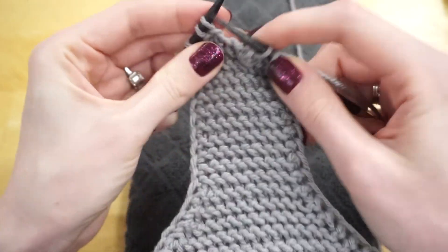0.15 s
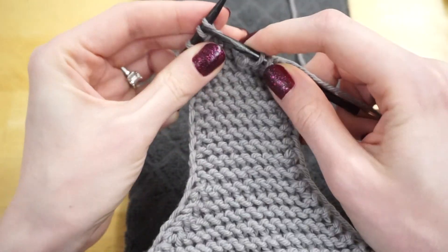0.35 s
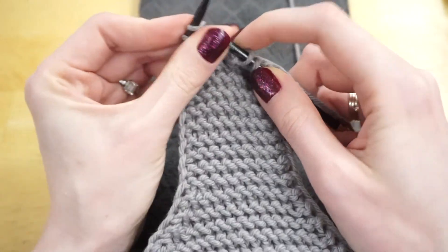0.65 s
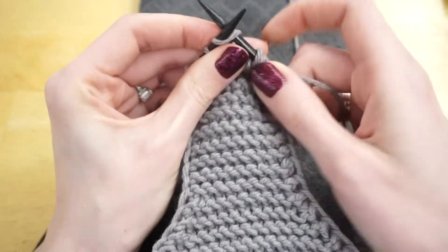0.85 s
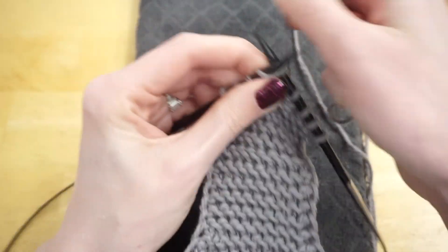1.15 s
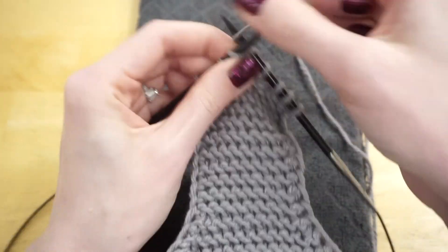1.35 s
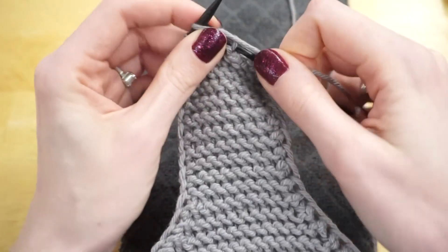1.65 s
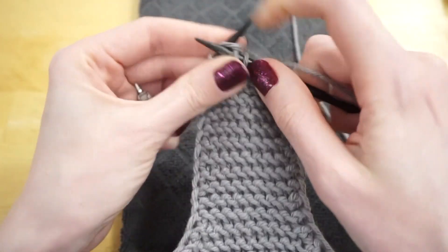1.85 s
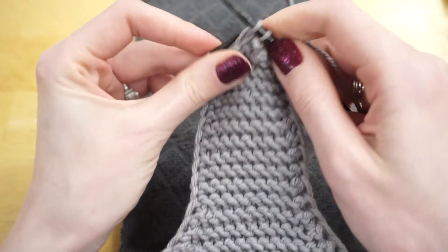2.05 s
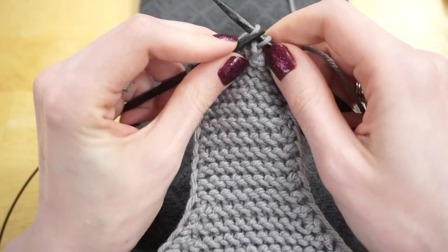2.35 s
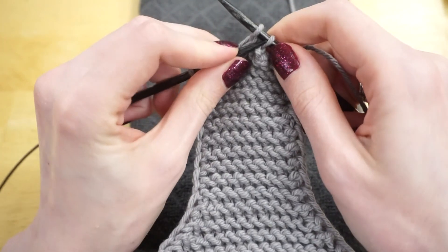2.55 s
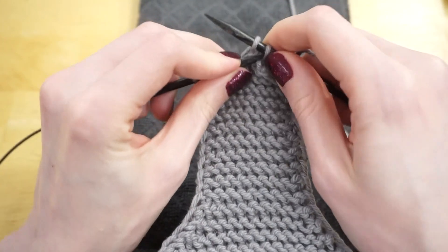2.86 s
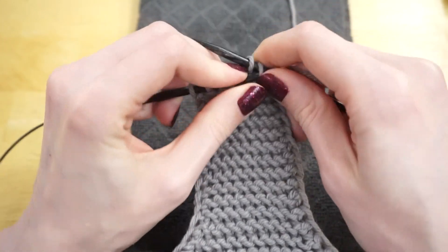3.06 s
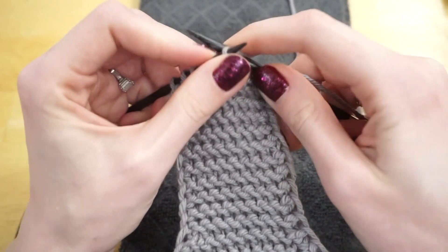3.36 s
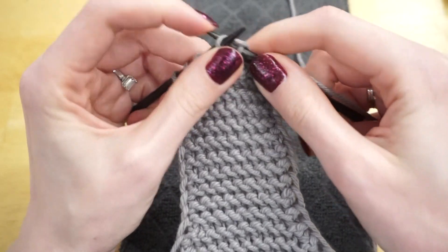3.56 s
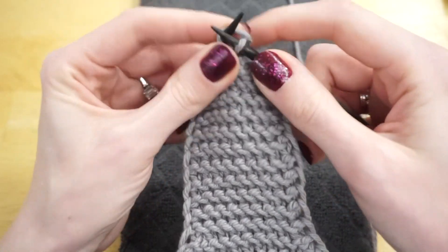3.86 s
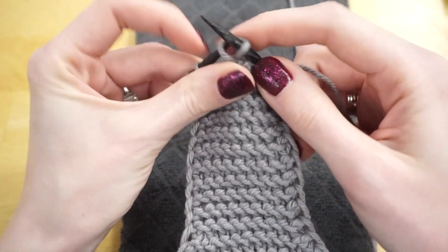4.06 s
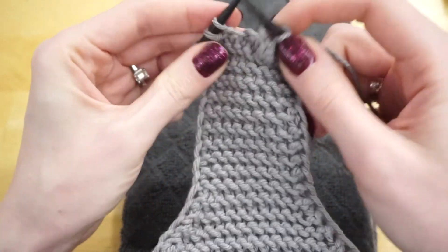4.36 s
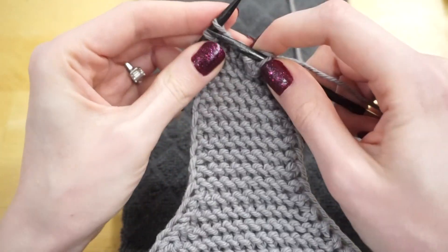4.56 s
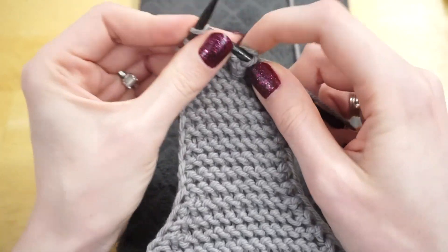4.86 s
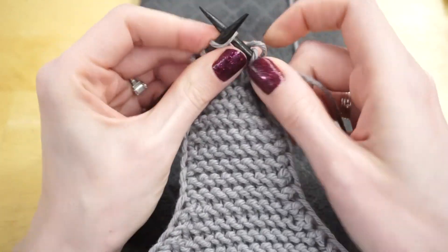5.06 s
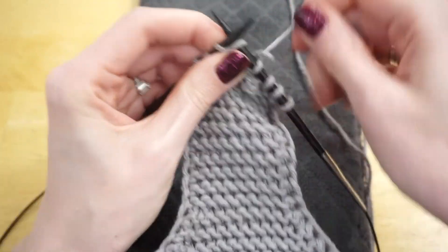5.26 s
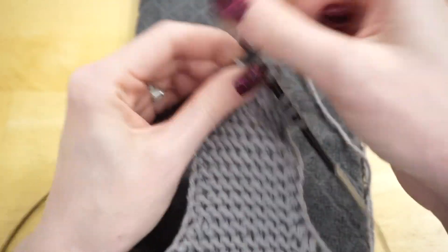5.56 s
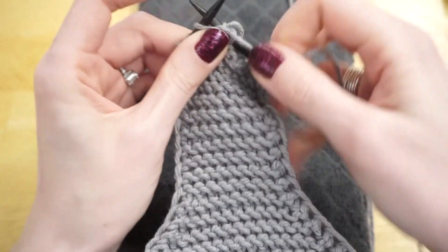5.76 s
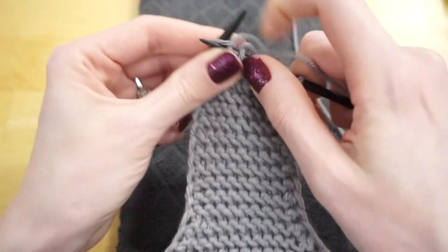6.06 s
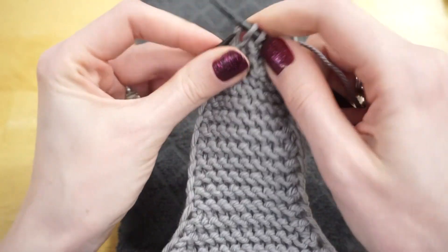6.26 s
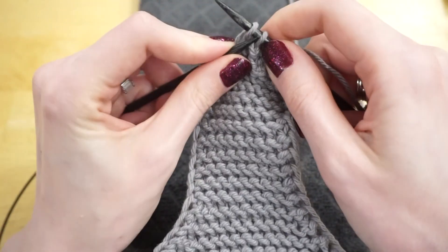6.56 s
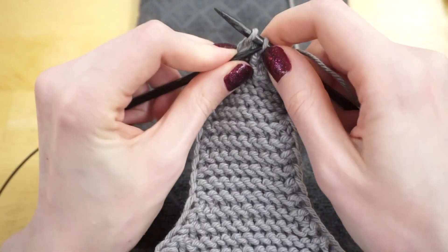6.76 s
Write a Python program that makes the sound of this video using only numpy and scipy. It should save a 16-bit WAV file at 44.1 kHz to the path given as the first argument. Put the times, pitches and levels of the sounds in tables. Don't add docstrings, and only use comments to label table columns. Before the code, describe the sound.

Quiet indoor room, close stereo microphones, little reverberation. A low fan hum wavers softly throughout, with a faint hollow rattle fluttering about fifteen times a second, swelling and fading. A soft slide opens the scene, and a crisp double needle knock comes at 0.15-0.2 s. Small scrapes and clicks follow at 0.6-0.8 s. From 0.9 to 1.4 s yarn swishes airily over fingers while cloth shuffles dully; clacks and slides continue to 2.2 s. Around 2.5 s it becomes sparse, with one light tick. Tiny ticks cluster near 3.1 s amid soft swishing, then scrapes and taps at 3.4-3.8 s. Sharper knocks strike at 4.13 and 4.4 s, while the rattle grows clearer around 4.5 s. Between 4.8 and 5.9 s clicks, yarn strokes and slides crowd together. Brushing continues past 6 s, a clack lands at 6.4 s, and a final small tick comes at 6.85 s.

```python
import sys
import numpy as np
from scipy import signal
from scipy.fft import rfft, irfft
from scipy.io import wavfile
from scipy.ndimage import uniform_filter1d

SR = 44100
rng = np.random.default_rng(int(sys.argv[2]) if len(sys.argv) > 2 else 0)


def volts_from_db(level):
    exponent = np.asarray(level, float) / 20
    return 10 ** exponent


def int16_out(signal):
    q = np.round(np.clip(np.atleast_2d(signal).T, -1, 1) * 32767)
    wavfile.write(sys.argv[1], SR, q.astype(np.int16))


N = 304069
T = np.arange(N) / SR
FREQ = np.maximum(np.arange(N // 2 + 1) * SR / N, 1)

# frequency in Hz, level in dB, 60 dB decay time in seconds.
SHAFT = [
    (2490, 2, 0.017),
    (2900, 0, 0.012),
    (3590, -1, .009),
    (1810, -5, 0.006),
]
# time in seconds, lowest shaft mode in Hz, extra body click of a knock in dB.
GRIP = [(0.15, 2700, 0), (0.2, 2800, -2), (0.61, 2350, -5), (1.1, 2450, -2), (1.58, 2300, 0),
        (1.69, 2500, -1), (2.05, 2500, 0), (4.13, 2400, -1), (4.39, 2650, 3), (4.8, 2650, 0),
        (5.23, 2700, 2), (5.26, 2500, 1), (5.36, 2450, -2), (5.61, 2500, 4), (5.83, 2300, -1),
        (6.41, 2400, 0)]


def on_log_hz(table):
    hz, value = np.transpose(table)
    return np.interp(np.log(FREQ), np.log(hz), value)


def band(x, lo_hz, hi_hz):
    return signal.sosfilt(signal.butter(2, [lo_hz, hi_hz], "band", fs=SR, output="sos"), x)


def ring(x, hz, t60):
    pole = np.exp(2j * np.pi * hz / SR - np.log(1000) / (t60 * SR))
    return signal.lfilter([1], [1, -pole], x).imag


def walk(rate):
    hold = int(SR / rate)
    steps = np.repeat(rng.standard_normal(N // hold + 1), hold)
    return 1.06 * uniform_filter1d(uniform_filter1d(steps, hold), hold)[:N]


def pair(mid, side, pan_db):
    return np.array([(mid + side) * volts_from_db(pan_db / 2), (mid - side) * volts_from_db(-pan_db / 2)])


def room_air():
    # frequency in Hz, width in Hz, height over the air noise in dB.
    room_modes = [(29.8, 10, 9), (56.3, 13, 7), (119.7, 9.7, 5), (145.9, 15, 8), (170.7, 23, 2.5),
                  (222.8, 19, 7), (247.7, 11, 4.5), (311, 7.9, 4), (377.7, 14, 3.5), (538.4, 10, 4.5)]
    # frequency in Hz, density in dB per Hz.
    air = [(15, -91.5), (40, -82.5), (80, -85.5), (118, -75.5), (250, -74), (400, -85), (700, -94.5),
           (1100, -98.5), (1400, -103), (2500, -106.5), (4500, -108), (9000, -108.5), (12000, -108),
           (16000, -108)]
    # frequency in Hz, side minus mid in dB.
    air_side = [(60, -20), (110, -23), (200, -20), (380, -7.5), (700, -0.5), (1290, 3.5), (2380, 4),
                (4400, 4), (8120, 1.5), (15000, -0.5)]
    # time in seconds, hum level in dB.
    hum = [(0.0, -48.5), (0.9, -48), (1.1, -46.5), (1.44, -46.5), (1.5, -49), (1.7, -46.5), (1.78, -49),
           (2.01, -47), (2.7, -50), (3.05, -47.5), (3.5, -46), (3.95, -46), (4.2, -51), (4.43, -48),
           (6.31, -50), (6.54, -51.5), (6.62, -48.5), (6.89, -48.5)]
    lift = sum(volts_from_db(db) ** 2 / (1 + (2 * (FREQ - hz) / width) ** 2) ** 2 for hz, width, db in room_modes)
    shape = volts_from_db(on_log_hz(air)) * np.sqrt((1 + lift) * SR / 2)
    mid, side = rfft(rng.standard_normal((2, N))) * shape
    both = pair(mid, side * volts_from_db(on_log_hz(air_side)), 0.43)
    low = 1 / (1 + (FREQ / 600) ** 4)
    swell_db = np.interp(T, *np.transpose(hum)) + 1.6 * walk(4.5)
    bass = irfft(both * low, N) * volts_from_db(swell_db - swell_db.mean())
    return bass + irfft(both * (1 - low), N)


def motor():
    # frequency in Hz, level in dB rms.
    lines = [
        (30.2, -64.5),
        (56.0, -66),
        (119.7, -63),
    ]
    out = np.zeros(N)
    for hz, db in lines:
        tone = np.sqrt(2) * np.sin(2 * np.pi * hz * T + 0.62 * walk(4))
        out += volts_from_db(db + 2.0 * walk(5.4)) * tone
    return out


def shaking():
    # time in seconds, peak level in dB, seconds to settle by 10 dB.
    jolts = [(0.02, -57, .04), (0.125, -60, .04), (0.25, -63, .045), (0.39, -60, .05), (0.66, -62, .04),
             (0.75, -63, .09), (0.92, -60.5, .08), (1.2, -65, .15), (1.385, -52, .12), (1.56, -64, .6),
             (1.8, -58.5, .035), (2.03, -59, .04), (2.13, -60.5, .09), (2.26, -64.5, .09), (2.52, -68, .3),
             (2.66, -64, .07), (2.795, -57, .045), (3.01, -70, .05), (3.61, -68, .07), (3.8, -64, .5),
             (4.19, -64, .4), (4.455, -58.5, .7), (4.6, -58, .5), (4.85, -62, .1), (4.92, -59.5, .35),
             (5.85, -70, .25), (6.67, -60, .05), (6.86, -64.5, .06)]
    rise_s, rest_db = .015, -76.0
    loudest_db = np.full(N, rest_db)
    for s, db, settle_s in jolts:
        loudest_db = np.maximum(loudest_db, db + 10 * np.minimum((T - s) / rise_s, (s - T) / settle_s))
    return volts_from_db(loudest_db)


def rattle():
    # frequency in Hz, level in dB, 60 dB decay time in seconds.
    modes = [
        (924, -4.5, 0.077),
        (1071, -0.5, 0.052),
        (930, -5.5, 0.018),
    ]
    turn_hz, start_turns = 14.975, .64
    turn = (T * turn_hz - start_turns) % 1
    strong = np.exp(-((turn - .14) / 0.066) ** 2)
    weak = 0.47 * np.exp(-((turn - .45) / 0.08) ** 2)
    knocks = rng.standard_normal((2, N)) * (strong + weak + 0.15) * volts_from_db(0.8 * walk(24.94))
    panel = band(sum(volts_from_db(db) * ring(knocks, hz, t60) for hz, db, t60 in modes), 890, 1070)
    panel = panel / panel.std()
    return pair(panel[0], 0.57 * panel[1], 1.7) * shaking() * volts_from_db(-1.2)


def cloth():
    # time in seconds, half length in ms, level in dB rms.
    shifts = [(0.614, 8, -58.5), (0.77, 25, -66), (1.12, 150, -61), (1.63, 45, -63), (3.62, 40, -68),
              (4.75, 70, -67), (5.28, 40, -67), (0.58, 4, -63), (5.259, 3, -59), (1.596, 3, -61),
              (1.0, 60, -62)]
    swell = sum(volts_from_db(db) * np.exp(-(1000 * (T - s) / half_ms) ** 2 / 2) for s, half_ms, db in shifts)
    grains = rng.standard_normal((2, N)) * volts_from_db(3.0 * walk(60))
    shuffle = band(np.cumsum(grains, axis=1), 240, 1300)
    return pair(shuffle[0], .6 * shuffle[1], 1.5) * swell / shuffle.std()


def touches():
    # time in seconds, crack level in dB, contact in ms,
    # body click relative to the crack in dB, left minus right in dB.
    tips = [(0.58, -54, 1.5, -11, 0), (0.7591, -40, 2.2, -16, -3), (1.4107, -45.5, 1.6, -22, -6),
            (1.6309, -48.5, 2.5, -3, 3), (1.9512, -47, 0.92, -17, 1), (1.96, -42, 1.3, -16, -2),
            (2.4345, -44.5, 0.7, -10.5, 1), (3.0543, -50, 0.6, -17, -2), (3.0681, -58, 0.4, -21, -3),
            (3.0778, -44, 0.6, -16, -4), (3.1198, -51, 0.5, -15, -3), (3.1359, -52, 0.5, -8, -4),
            (3.4665, -49, 2.5, -15, -4), (3.621, -48, 2.5, -9, -8), (3.764, -62, 1, 12, 2),
            (4.7845, -50, 0.9, -15, 1), (4.8404, -52, 1.2, -5, -1), (5.7295, -49, 1.8, -13, -1),
            (6.103, -43, 1, -23, 0), (6.162, -56, 0.81, 8, 5), (6.8551, -54, 1.3, -10, -1),
            (1.2364, -50, 1.2, -14, -2), (5.191, -52, 1.2, -6, -2), (0.9233, -51, 1, -19, -5),
            (1.4795, -49, 1, -20, -1.5), (1.8198, -50, 1, -17, -2.5), (4.1474, -51, 1.5, -10, 1),
            (4.9734, -50, 1.5, -8, -1), (5.7184, -50, 1.2, -14, -0.6), (6.0496, -48, 1, -20, -2)]
    # time in seconds, crack level in dB, contact in ms,
    # shaft ring relative to the crack in dB, left minus right in dB.
    knocks = [(0.1521, -36, 1.2, -8, 1), (0.2026, -44.5, 0.8, -10, 2), (0.612, -60, 2.5, 6, 0),
              (1.0696, -51, 1.5, 1.5, -2), (1.11, -52, 1.2, -1, 1), (1.123, -56, 2.2, 6, 2),
              (1.156, -58, 1.5, 3, -1), (1.5, -60, 1.5, 4, 0), (1.5765, -42.5, 2.8, -1.5, 3),
              (1.686, -42.5, 2.4, -4.5, 1), (2.0455, -45, 0.8, -9, -2), (2.178, -47.5, 2.5, -6.5, 0),
              (5.357, -54, 2.8, 5, -3), (3.448, -55, 1.1, -5, -2), (4.1337, -40, 2.3, -8, 5),
              (4.3934, -41.5, 1.5, -11, -1), (4.802, -46, 1.2, -10, 1), (5.2333, -46, 0.7, -8, -5),
              (5.2529, -48, 0.4, -6.5, 6), (5.2618, -44, 2.8, 1, 1), (5.6098, -45, 1.5, -6, 2),
              (5.6688, -50, 1.2, -10, -2), (5.8335, -51, 2.8, 3.5, 0), (6.4072, -43.5, 2.9, -9, -4),
              (0.598, -64, 2.5, 6, 0), (0.756, -62, 2.8, 7, 0), (0.778, -63, 2.5, 6, 0),
              (5.2575, -56, 1, 4, 1), (5.6035, -58, 2, 4, -1), (5.742, -62, 2, 5, 0)]
    out = [(s, db, ms, body_db, -19, pan_db) for s, db, ms, body_db, pan_db in tips]
    for s, db, ms, shaft_db, pan_db in knocks:
        grip_db = np.interp(s, *np.transpose(GRIP)[::2])
        body_db = -7 + .4 * shaft_db + grip_db
        out.append((s, db, ms, body_db, shaft_db - 1, pan_db))
    return out


def ticks():
    length = 2048
    echo_s, echo_db = .0043, -7
    out, t = np.zeros((2, N + length)), np.arange(length) / SR
    for s, crack_db, contact_ms, body_db, shaft_db, pan_db in touches():
        noise = rng.standard_normal((2, length))
        grip = np.interp(s, *np.transpose(GRIP)[:2]) / SHAFT[0][0]
        fade = np.exp(-1000 * t / max(contact_ms, .1)) + 0.14 * np.exp(-t / 0.0096)
        blows, pushes = noise * fade, .6 * noise * fade
        blows[0, 0] = pushes[0, 0] = 5.5
        crack = band(band(blows, 7000, 16300), 6300, 17000) + 0.018 * ring(blows, 11000, 0.0071)
        body = band(band(pushes + .25 * blows, 3500, 6200), 3300, 7000)
        shaft = sum(volts_from_db(db) * ring(pushes, hz * grip, t60) for hz, db, t60 in SHAFT)
        shaft = band(shaft + 8.0 * pushes, 1500, 4300)
        touch = np.zeros((2, length))
        for part, db, echoes in ((crack, 0, 0), (body, body_db, 1), (shaft, shaft_db, 1)):
            late = np.roll(part, int(echo_s * SR), axis=1) * (t > echo_s)
            part = part + echoes * volts_from_db(echo_db) * late
            touch += volts_from_db(db) * part * np.sqrt(SR / 1000 / np.sum(part[0] ** 2))
        side = touch[1] * np.sqrt(np.sum(touch[0] ** 2) / np.sum(touch[1] ** 2))
        i = int(s * SR)
        out[:, i:i + length] += volts_from_db(crack_db) * pair(touch[0], 0.5 * side, pan_db)
    return out[:, :N]


def strokes():
    # time in seconds, half length in ms, fibre hiss in dB,
    # skin drag relative to the hiss in dB, brightest frequency in Hz.
    yarn = [(0.0, 87, -51.0, -7.5, 10200), (0.45, 17, -57.0, -5.0, 8300), (0.91, 37, -63.0, -7.0, 13400),
            (0.953, 26, -48.5, -10.5, 13400), (1.009, 25, -46.5, -9.5, 9200),
            (1.081, 41, -49.5, -7.5, 13000), (1.162, 40, -45.0, -8.0, 9100),
            (1.259, 35, -45.0, -10.0, 14600), (1.337, 25, -48.5, -7.5, 11500),
            (2.118, 20, -53.5, -8.5, 13300), (2.639, 15, -66.5, -12.0, 7800),
            (2.952, 24, -59.5, -8.5, 11900), (3.031, 39, -55.0, -10.0, 10900),
            (3.148, 13, -54.5, -14.5, 15000), (3.202, 98, -58.0, -6.0, 13800),
            (3.38, 73, -65.5, -10.0, 6500), (4.197, 31, -60.0, -8.5, 10000),
            (4.259, 16, -52.5, -11.5, 12600), (4.936, 35, -50.0, -5.5, 12600),
            (5.145, 17, -55.0, -15.5, 14000), (5.218, 77, -50.5, -8.5, 14100),
            (5.464, 27, -46.0, -17.0, 14300), (5.498, 42, -49.5, -4.5, 14300),
            (5.547, 35, -54.0, -6.0, 13100), (5.966, 16, -54.5, -7.5, 9800),
            (6.075, 77, -52.0, -7.5, 12200), (6.08, 32, -48.0, -15.0, 12500),
            (6.185, 9, -48.5, -11.0, 13000), (6.343, 29, -54.0, -6.0, 8100)]
    stitches = [(0.589, 12, -51.5, -5.5, 9800), (0.75, 32, -47.5, -5.0, 9500),
                (1.418, 29, -52.5, -9.5, 15000), (1.482, 20, -51.5, -9.5, 12700),
                (1.556, 56, -58.5, -8.0, 10700), (1.581, 10, -53.0, -4.5, 10500),
                (1.663, 26, -46.5, -9.0, 10700), (1.863, 66, -48.5, -9.0, 13300),
                (1.961, 15, -48.5, -6.5, 9800), (2.026, 28, -50.5, -8.0, 13400),
                (2.147, 106, -55.0, -6.5, 13300), (2.333, 24, -64.0, -6.5, 9100),
                (3.211, 26, -49.0, -12.0, 13800), (3.456, 26, -56.5, -8.5, 15000),
                (3.591, 69, -54.5, -6.5, 11500), (3.892, 78, -54.5, -7.0, 12600),
                (4.081, 27, -55.5, -9.5, 10700), (4.331, 111, -57.0, -7.5, 12400),
                (4.645, 21, -59.0, -5.0, 12200), (4.801, 10, -48.0, -6.5, 14600),
                (4.805, 168, -60.5, -3.0, 14800), (4.96, 16, -49.0, -4.0, 6500),
                (5.38, 56, -53.0, -5.0, 9100), (5.628, 23, -50.5, -7.0, 11400),
                (5.676, 12, -49.5, -6.0, 15000), (5.877, 46, -50.5, -8.0, 8300),
                (6.17, 17, -50.5, -2.5, 8600), (6.221, 78, -56.5, -5.0, 8100),
                (6.86, 10, -53.0, -13.0, 13600)]
    # time in seconds, half length in ms, fibre hiss in dB,
    # skin drag relative to the hiss in dB.
    slides = [(0.097, 160, -59, -7), (0.618, 133, -62.5, -7), (0.846, 59, -63, -1.5), (4.5, 50, -65, -5),
              (1.682, 77, -54.5, -5.5), (3.614, 16, -52, -9), (3.737, 46, -63, -0.4), (4.006, 32, -59, -5),
              (4.143, 20, -55, -6), (4.312, 46, -58.5, -2.5), (5.015, 62, -63, -1.5),
              (5.275, 22, -52.5, -6), (5.316, 60, -53, -7), (5.355, 18, -50, -2), (5.723, 43, -56, -3.5),
              (5.915, 69, -57, -5), (5.79, 40, -61, -4), (6.423, 65, -60, -3), (6.583, 93, -66, -6)]
    # time in seconds, left minus right in dB.
    hand = [(0, -0.6), (0.8, 0.3), (0.95, -4.5), (1.3, -2.5), (1.7, -0.6), (2.2, 0.3), (3.0, -1.6),
            (3.5, -2.5), (4.1, 0.4), (5.0, -0.6), (5.4, -4.5), (5.7, -1.2), (6.89, -0.8)]
    bright_slides = [(*row, 9500) for row in slides]
    out = []
    for rows, scrape_db in ((yarn, -18.5), (stitches, -14), (bright_slides, -7)):
        out += [(*row, scrape_db, np.interp(row[0], *np.transpose(hand))) for row in rows]
    return out


def rub():
    # centre in Hz, width in Hz.
    bands = [
        (500, 3000),
        (2600, 3000),
        (6400, 4500),
        (12000, 6800),
    ]
    length = 32768
    lag_s = 5e-6
    edge = 2.4
    out = np.zeros((2, N + 2 * length))
    t, hz = (np.arange(length) - length // 2) / SR, np.arange(1, length // 2 + 2) * SR / length
    table_db = 1.65 * np.exp(-((hz - 10300) / 700) ** 2)
    shaft_db = 3.0 * np.exp(-((hz - SHAFT[0][0]) / 260) ** 2)
    centre, width = np.transpose(bands)
    for s, half_ms, hiss_db, drag_db, shine_hz, scrape_db, pan_db in strokes():
        parts_db = np.array([-10.5 + scrape_db, scrape_db + 0.8, drag_db + 1.4, 0])
        density = hiss_db + parts_db - 10 * np.log10(width)
        bumps_db = 1.3 * np.interp(np.sqrt(hz / 16000), np.arange(25) / 24, rng.standard_normal(25))
        shine_db = 3.2 * (np.exp(-((hz - shine_hz) / 1500) ** 2) - .3)
        colour_db = np.interp(np.log(hz), np.log(centre), density) + table_db + shaft_db + bumps_db + shine_db
        clusters = np.repeat(rng.standard_normal(length // 128), 128)
        slips = volts_from_db(1.6 * rng.exponential(size=length) + 1.6 * clusters)
        grains = rng.standard_normal((3, length)) * slips / np.sqrt(np.mean(slips ** 2))
        direct, *scattered = rfft(grains) * volts_from_db(colour_db) * np.sqrt(SR / 2)
        lag = np.exp(1j * np.pi * hz * lag_s * pan_db)
        both = np.array([direct * lag, direct / lag]) + .85 * np.array(scattered)
        both = both * volts_from_db([[pan_db / 2], [-pan_db / 2]])
        swell = np.exp(-np.abs(960 * t / half_ms) ** edge / 2)
        i = int(s * SR) + length // 2
        out[:, i:i + length] += irfft(both, length) * swell
    return out[:, length:length + N] * volts_from_db(-4.5)


def scene():
    return room_air() + motor() + rattle() + cloth() + ticks() + rub()


def roll_off(x):
    return signal.sosfilt(signal.butter(12, 17050, fs=SR, output="sos"), x)


def record(dry):
    mix = irfft(rfft(dry) * (FREQ < 15850), N)
    return roll_off(mix)


dry = scene()
out = record(dry)
int16_out(out)
```